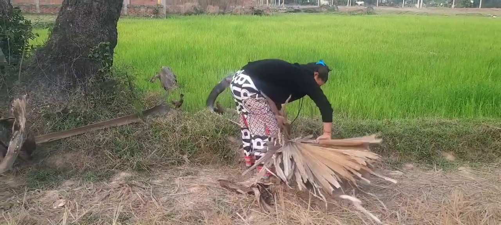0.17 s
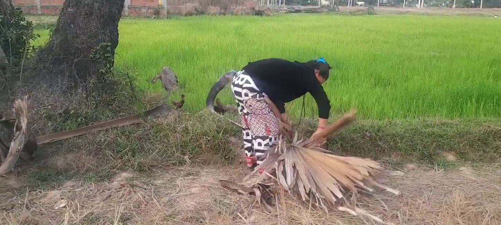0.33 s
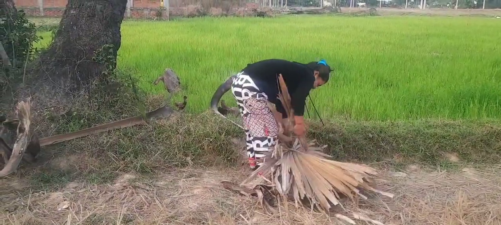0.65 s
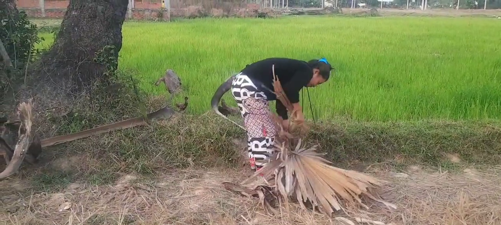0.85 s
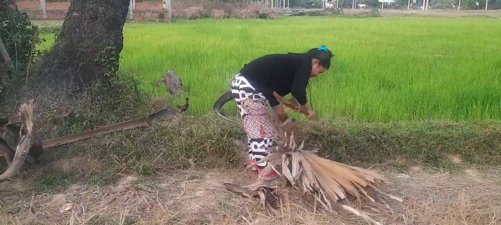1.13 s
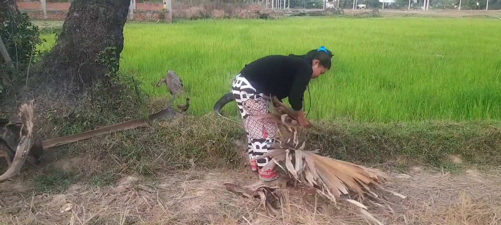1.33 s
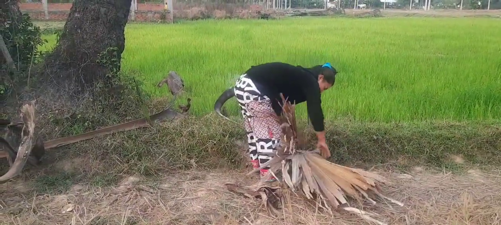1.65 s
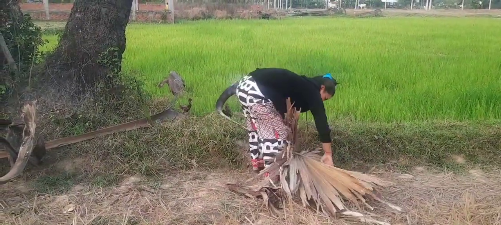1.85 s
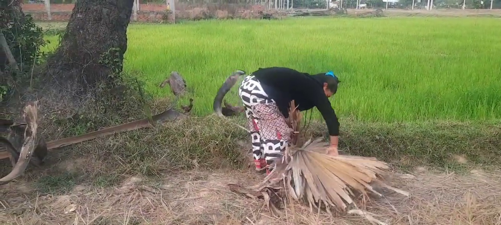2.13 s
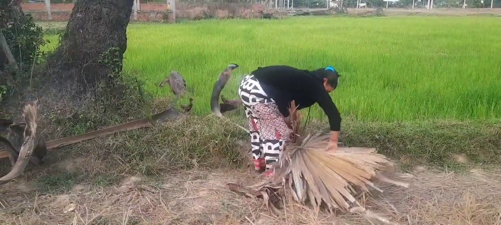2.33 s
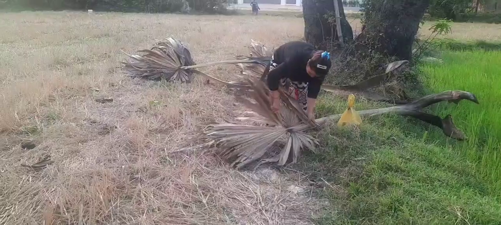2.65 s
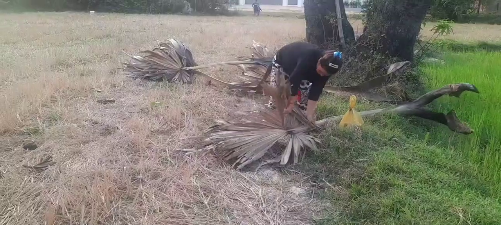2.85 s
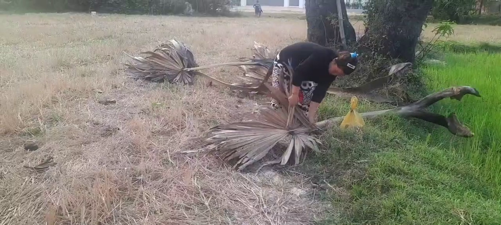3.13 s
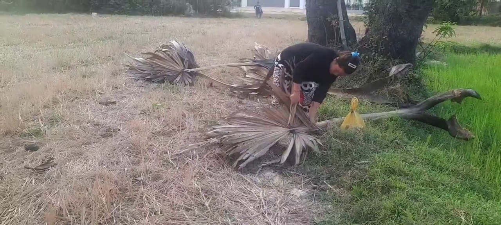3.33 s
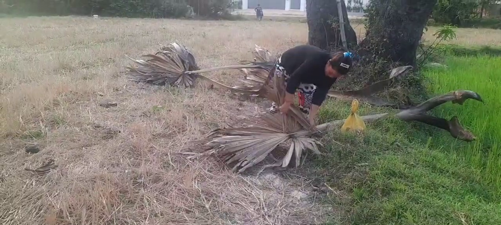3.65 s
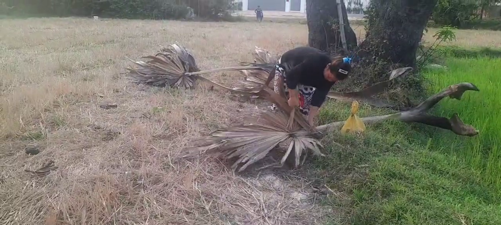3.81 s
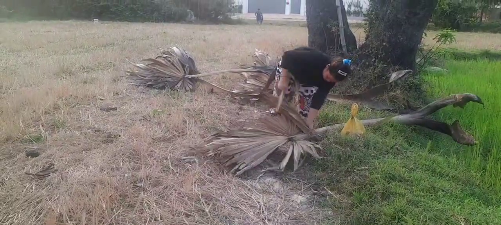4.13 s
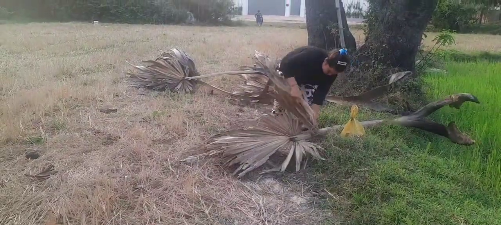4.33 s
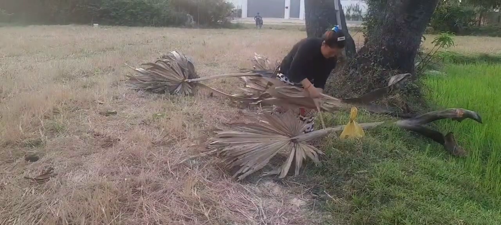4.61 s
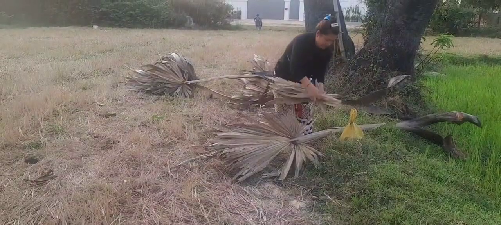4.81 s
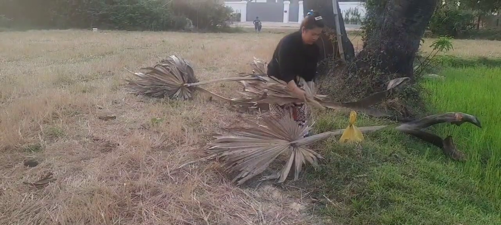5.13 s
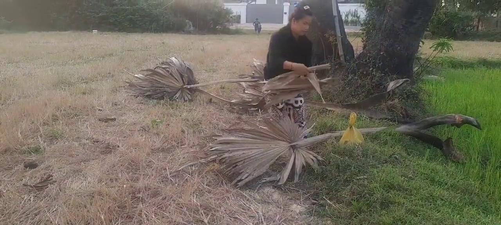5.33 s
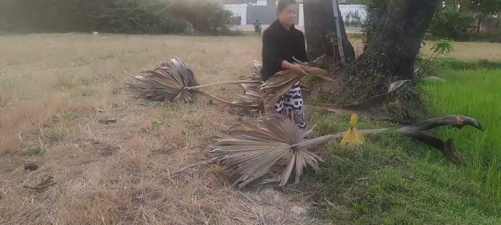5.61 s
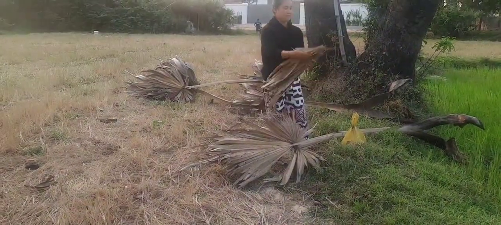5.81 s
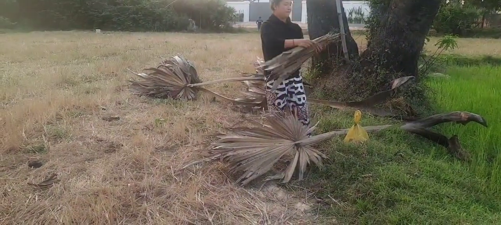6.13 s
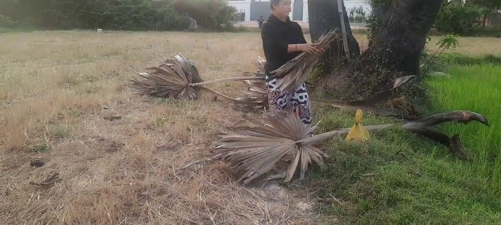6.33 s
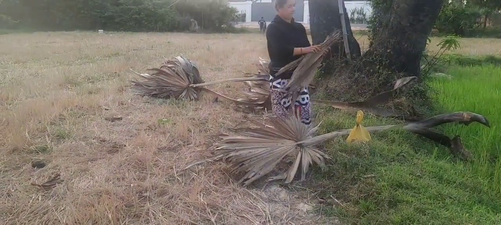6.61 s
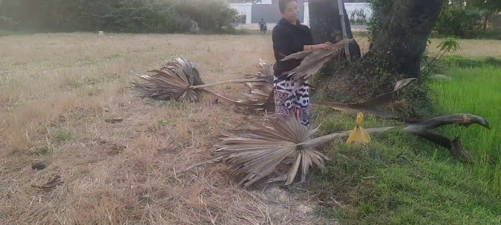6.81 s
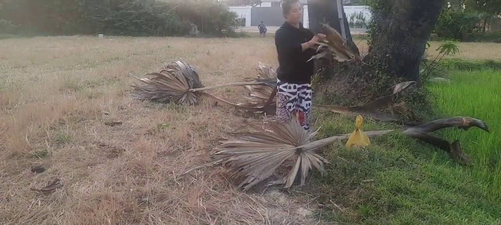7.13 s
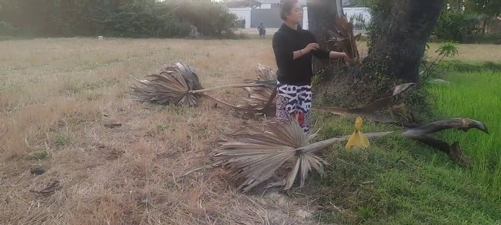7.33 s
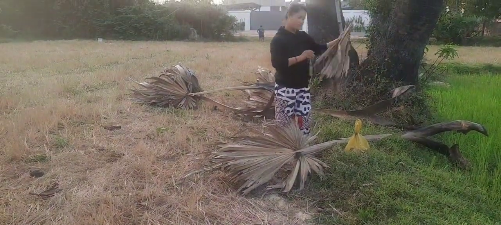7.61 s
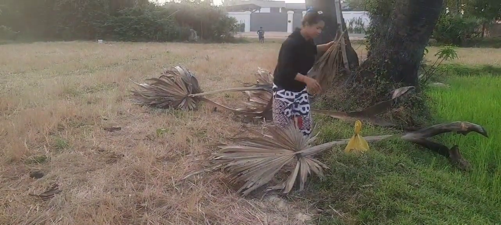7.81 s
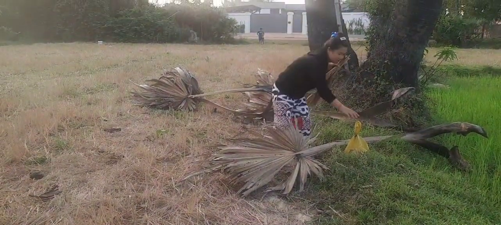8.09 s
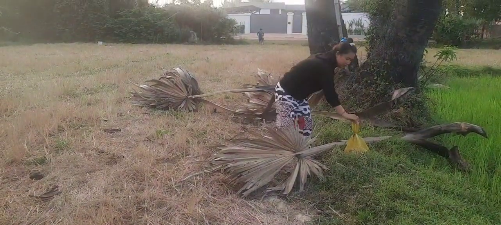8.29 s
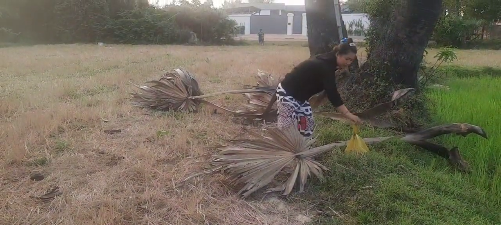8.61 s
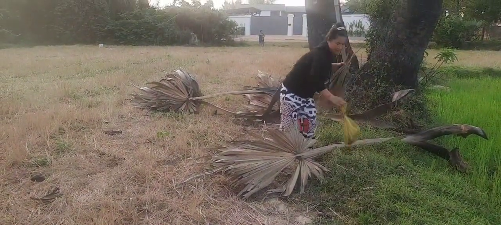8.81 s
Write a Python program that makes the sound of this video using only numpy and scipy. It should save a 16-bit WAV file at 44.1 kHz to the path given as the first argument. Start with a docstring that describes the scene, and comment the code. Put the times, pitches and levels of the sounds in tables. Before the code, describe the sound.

Dry fan-palm leaves rustle, snap and scrape as they are torn and bundled by hand outdoors, with light wind and faint birds.

```python
"""Dry fan-palm leaves rustle at once, then snap and scrape, torn and bundled by hand a few metres away.
Swarms of tiny clicks make the buckling blades; shaped bursts of them snap and tear, and the pile scatters all.
Two spots follow each other with a very short silence between; the second fan gives way to loose strips in the hands.
Low noise makes the breeze and the gusts at the right port, pale noise the open air, blurred tones the faint birds."""
import sys
import numpy as np
from scipy import signal
from scipy.fft import rfft, irfft, next_fast_len
from scipy.io import wavfile
from scipy.ndimage import uniform_filter1d

SR = 44100
rng = np.random.default_rng(int(sys.argv[2]) if len(sys.argv) > 2 else 0)


def log_audio(samples):
    """Write samples as a 16-bit WAV file to the path given in sys.argv[1]."""
    # one column per channel
    frames = np.atleast_2d(samples).T
    # limit to full scale, then quantise
    limited = np.clip(frames, -1, 1)
    pcm = np.round(limited * 32767).astype(np.int16)
    wavfile.write(sys.argv[1], SR, pcm)


N = 394694
TIME = np.arange(N) / SR  # seconds
FREQ = np.arange(N // 2 + 1) * SR / N + 1e-3  # Hz, kept above zero for the logarithm

CUT_S, RESUME_S = 2.391, 2.421  # silence between the two spots
IN_HANDS_S = 5.25  # from here on loose strips are handled
GRIP_S, LET_GO_S = .015, 0.025  # a stroke builds, a stroke dies away
REST_DB, REST_BODY_DB = -57, 0  # leaves that are only held: rustle level and hollowness
PILE_DB, PILE_S, TREES_S = -6, .004, .032  # smear in the pile; fade of the tail from the trees
CEILING, TOP_HZ = .85, 15700  # soft limit (full scale 1) and top of the spectrum

# The hands pull, gather or shift the leaves; body is the hollow share below 2 kHz:
# start_s [s], length_s [s], level_db [dB before colouring], body_db [dB]
STROKES = [(0.0, 0.16, -32, -2.5), (0.195, 0.064, -26.5, 2.5), (0.358, 0.078, -29, -4.5),
           (0.552, 0.05, -31, -2), (0.724, 0.089, -36, 8.5), (1.031, 0.068, -36.5, 2.5),
           (1.237, 0.12, -31, -3.5), (1.771, 0.1, -35.5, -4.5), (1.961, 0.12, -35, 0),
           (2.161, 0.023, -33, 10.5), (2.445, 0.14, -32.5, -10), (2.587, 0.19, -24, -7.5),
           (2.975, 0.17, -35, -9), (3.66, 0.31, -33, -1), (3.814, 0.025, -29, -4), (4.0, 0.12, -31.5, -5),
           (4.242, 0.4, -41, 3), (4.928, 0.025, -30, 0), (5.055, 0.1, -40.5, 3.5),
           (5.272, 0.25, -45.5, 4.5), (5.501, 0.11, -31.5, -1), (5.704, 0.092, -37, 3.5),
           (5.824, 0.051, -32.5, 0.5), (5.961, 0.018, -38.5, 3), (6.183, 0.14, -30.5, 0.5),
           (6.393, 0.25, -39, 3), (6.674, 0.073, -39.5, 3.5), (6.923, 0.21, -50, -4),
           (7.772, 0.023, -43, 4), (7.986, 0.011, -44, 5), (8.107, 0.039, -46, 14.5), (8.61, 0.38, -55, -1)]
# How the first fan, the second fan and the strips move, one row each:
# smooth_drag [0-1], settling_db [dB against the stroke], settling_s [s]
FEEL = [(0.07, -9.5, 0.43), (0.2, -7, 0.31), (0.45, -5.5, 0.1)]
# A blade snaps or is knocked; body is its hollow share:
# start_s [s], level_db [dB peak before the overall trim], body_db [dB]
SNAPS = [(0.106, -10, -23), (0.148, -14, -18), (0.184, -3.5, -8), (0.313, -6, -7), (0.344, -6, -18),
         (0.38, -14, -16), (0.421, -11.5, -28), (0.496, -14.5, -22), (0.536, -16, -19), (0.604, -10.5, -20),
         (0.654, -17, -23), (0.663, -7, -14), (0.672, -8, -18), (0.717, -8.5, -12.5), (0.748, -9, -9.5),
         (1.277, -6.5, -16.5), (1.435, -16.5, -32), (2.159, -10.5, -1), (2.302, -17, -15),
         (2.386, -21, -38), (2.439, -7.5, -21.5), (2.452, -8.5, -7.5), (2.505, -7, -21), (2.521, 0, -24),
         (2.57, -3.5, -22), (2.619, -5, -14), (2.69, -2, -27), (2.701, -0.5, -21), (2.783, -6.5, -10.5),
         (2.816, -10.5, -12), (2.835, -7, -17.5), (2.914, -12.5, -27), (2.933, -5.5, -31),
         (2.957, -5.5, -17), (2.998, -5, -19), (3.023, -7.5, -33), (3.055, -16, -29), (3.078, -17.5, -31),
         (3.104, -6.5, -27), (3.283, -17.5, -10), (3.438, -20, -36), (3.575, -12, -20.5),
         (3.988, -5.5, -23.5), (4.16, -14, -21), (4.889, -21.5, -3.5), (5.312, -20, -19), (5.512, -19, -18),
         (5.833, -19, -26), (6.03, -23, -12), (6.487, -16, -6), (6.619, -16, -28), (6.85, -20, -11),
         (7.032, -22, -11), (7.628, -21.5, -18), (7.806, -18.5, -14), (8.412, -36, -1.5)]
# A strip tears or slides over its neighbours:
# height_s [s], swell_s [s], fade_s [s], level_db [dB before ring and colouring], pitch_hz [Hz]
SCRAPES = [(0.229, 0.0015, 0.0086, -14, 1150), (2.525, 0.0099, 0.016, -18.5, 1600),
           (2.765, 0.033, 0.0087, -16, 1430), (3.117, 0.0061, 0.028, -21.5, 1150),
           (4.065, 0.017, 0.014, -15.5, 560), (6.156, 0.0071, 0.015, -23.5, 580),
           (6.181, 0.0075, 0.006, -18, 1160), (6.628, 0.019, 0.006, -26, 1620)]
# Colour of the brittle first fan: freq_hz [Hz], level_db [dB, relative]
FIRST_FAN = [(200, -22.5), (304, -6), (479, -10), (641, -14), (1030, -5), (1560, -12), (2090, -5),
             (2560, -14), (3890, -11), (7220, -15), (8980, -28), (12900, -20)]
# Colour of the second fan: freq_hz [Hz], level_db [dB, relative]
SECOND_FAN = [(120, -8), (200, -15.5), (333, -3.5), (497, -17), (880, -2.5), (1130, -9.5), (1650, -5.5),
              (2750, -9), (6020, -9.5), (9310, -24.5), (12000, -19), (15500, -29)]
# Colour of the loose strips in the hands: freq_hz [Hz], level_db [dB, relative]
STRIPS = [(200, -17), (340, -2.5), (500, -5.5), (850, -2), (1300, -6.5), (1750, -1), (2090, -8.5),
          (2440, -0.5), (3000, -5), (6300, -5), (9400, -20), (11800, -15), (15500, -25.5)]
# Left minus right at the two ports, before scaling by direction: freq_hz [Hz], difference_db [dB]
PORTS = [(600, 2), (2000, 4), (3300, -1), (6100, -5.5), (8700, -12), (10500, 10), (12300, 5.5), (15000, 0)]
# Colour of the light breeze: freq_hz [Hz], level_db [dB, relative]
RUMBLE = [(18, -23), (60, 2.5), (140, -3), (700, -45)]
# Colour of the open air: freq_hz [Hz], level_db [dB, relative]
OPEN_AIR = [(230, -21), (315, -2.5), (400, -12), (1100, -22), (4700, -27.5), (9300, -36.5), (10600, -22.5),
            (12500, -55)]
# Wind hits the right port: peak_s [s], level_db [dB before the overall trim]
GUSTS = [(2.45, -21.5), (2.919, -22), (3.647, -24), (3.743, -20), (5.03, -23), (5.247, -26.5), (5.404, -20),
         (5.683, -17), (5.765, -22), (5.88, -21), (6.024, -26), (6.327, -22.5)]
# Colour of the gusts: freq_hz [Hz], level_db [dB, relative]
BUFFET = [(25, -34), (60, 4.5), (110, 0), (190, -13.5), (700, -60)]
# Faint far bird notes: middle_s [s], pitch_hz [Hz], level_db [dB before blurring]
CHIRPS = [(5.335, 2820, -48), (5.94, 2730, -51), (7.39, 5500, -58), (8.11, 5570, -57)]


def undb(db):
    """Decibels to gain."""
    return 10 ** (np.asarray(db) / 20)


def unit(x):
    """Scale to rms 1."""
    return x / np.sqrt(np.mean(x ** 2) + 1e-18)


def sides(db):
    """Left and right gains for a level difference, left minus right."""
    return undb(np.array([[.5], [-.5]]) * db)


def bell(x, width):
    """A smooth hump around zero."""
    return np.exp(-(x / width) ** 2)


def shape(x, gain_at):
    """Filter by a gain that depends on frequency."""
    size = next_fast_len(x.shape[-1], real=True)
    hz = np.maximum(np.arange(size // 2 + 1) * SR / size, 1)
    return irfft(rfft(x, size) * gain_at(hz), size)[..., :x.shape[-1]]


def lows(x, corner_hz):
    """Steep low-pass."""
    return shape(x, lambda hz: 1 / (1 + (hz / corner_hz) ** 4))


def highs(x, corner_hz):
    """Gentle high-pass."""
    return shape(x, lambda hz: 1 / np.sqrt(1 + (corner_hz / hz) ** 4))


def db_at(points, hz):
    """Read (Hz, dB) points on a log-frequency axis."""
    f, db = np.transpose(points)
    return np.interp(np.log(hz), np.log(f), db)


def colour(x, points):
    """Give a white sound a spectrum and keep its power."""
    mean_power = np.mean(undb(db_at(points, FREQ)) ** 2)
    return shape(x, lambda hz: undb(db_at(points, hz))) / np.sqrt(mean_power)


def walk(rate_hz):
    """Smooth random wander with rms near 1, redrawn at the given rate."""
    size = int(SR / rate_hz)
    held = np.repeat(rng.standard_normal(N // size + 1), size)
    return unit(uniform_filter1d(held, size))[:N]


def jerks(per_s, fade_s):
    """Jerks at random moments; each starts at once and dies away."""
    starts = (rng.random(N) < per_s / SR) * (.5 + rng.random(N))
    return signal.lfilter([1], [1, -np.exp(-1 / (fade_s * SR))], starts)


def steady(x, span_s):
    """Hold the mean power of a sound constant over a short span, leaving its fine grain."""
    power = uniform_filter1d(np.mean(x ** 2, axis=0), max(int(span_s * SR), 2))
    return x / np.sqrt(power + 1e-6)


def air(apart_hz):
    """Noise that is alike at both ports in the bass and less alike in the treble."""
    mid, side = rng.standard_normal((2, N))
    side = highs(side, apart_hz)
    return unit(np.array([mid + side, mid - side]))


def hollow(x, body_db, corner_hz=2000):
    """Tip the balance: a whole blade bending sounds hollow, a splitting edge sounds sharp."""
    body = lows(x, corner_hz)
    return body * undb(body_db / 2) + (x - body) * undb(-body_db / 2)


def buckles(per_s, spread_db, tint_db, lag_s=7e-5, fan_s=3.6e-5):
    """A swarm of clicks, each with its own size, tint and place; the left port mostly hears them a little later."""
    count, size = 40000, next_fast_len(N, real=True)
    at = rng.integers(0, N, count)
    force = undb(spread_db * np.minimum(rng.exponential(size=count), np.pi))
    force = force * (np.arange(count) < per_s * N / SR)  # only as many clicks as the rate asks for
    lag = np.rint(SR * (lag_s + fan_s * rng.standard_normal(count))).astype(int)
    centres = np.log(np.geomspace(400, 14000, 10))
    pitch = np.log(np.arange(size // 2 + 1) * SR / size + 1)
    swarm = 0
    for band in np.eye(len(centres)):
        tint = undb(tint_db * (2 * rng.random(count) - 1))
        push = force * tint * rng.choice([-1, 1], count)
        left, right = np.bincount((at + lag) % N, push, size), np.bincount(at, push, size)
        swarm = swarm + rfft(np.array([left, right])) * np.sqrt(np.interp(pitch, centres, band))
    return unit(irfft(swarm, size)[:, :N])


def stage(s):
    """Which leaves are being worked: 0 the first fan, 1 the second fan, 2 the held strips."""
    return np.searchsorted([RESUME_S, IN_HANDS_S], s)


def handling():
    """Rustle level and hollowness in dB: strokes build, hold, let go and settle; hollowness is weighted by power."""
    power = np.full(N, undb(REST_DB) ** 2)
    body = power * REST_BODY_DB
    for start, length, db, body_db in STROKES:
        early, late = np.maximum(start - TIME, 0), np.maximum(TIME - start - length, 0)
        _, settle_db, settle_s = FEEL[stage(start)]
        release = np.maximum(np.exp(-late / LET_GO_S), undb(settle_db) * np.exp(-late / settle_s))
        stroke = (undb(db) * np.exp(-early / GRIP_S) * release) ** 2
        power = power + stroke
        body = body + stroke * body_db
    return 10 * np.log10(power), body / power


def rustle(effort_db, crackle_db=-5, slips_per_s=70, slip_s=0.011, tips_db=-7, tips_swing_db=5,
           tips_hz=4000, ticks_per_s=55, ticks_db=-6, tick_s=0.00067):
    """Blades drag with a fine hiss and buckle in crackles; they catch and slip in sudden spurts, and their tips tick."""
    crackle = steady(buckles(per_s=300, spread_db=1, tint_db=3.5), span_s=0.049)
    hiss = buckles(per_s=4000, spread_db=2.0, tint_db=2.0)  # dense enough to merge into a hiss
    drag = np.clip(np.array(FEEL)[stage(TIME), 0], 0, 1)
    grip = drag + jerks(slips_per_s, slip_s)
    edge = highs(hiss, tips_hz)
    tips = unit(edge * undb(tips_swing_db * walk(250)))
    spurts = steady(grip * (hiss + undb(tips_db) * tips), span_s=0.076)
    ticks = unit(edge * jerks(ticks_per_s, tick_s)) * (1 - drag)  # lone tips flick past each other
    return (spurts + undb(crackle_db) * crackle + undb(ticks_db) * ticks) * undb(effort_db)


def snaps(fibres, level_db=-13.0, tick_db=-1, tick_s=0.00088, crack_s=0.006, flap_db=-11, flap_s=0.0069,
          lead_db=-22, lead_s=0.0019, usual_body_db=-14, slow_db=0.5):
    """A blade gives way with a tick and a run of cracks after a very short soft rise, and flaps on; hollow ones slower."""
    fibres = steady(fibres + .5 * air(2300), span_s=0.0028)
    out, before = np.zeros((2, N)), SR // 50
    for s, db, body_db in SNAPS:
        span = slice(int(s * SR) - before, int(s * SR) + SR // 8)
        hollowness_db = body_db - usual_body_db
        age = (TIME[span] - s) / undb(slow_db * hollowness_db)  # stretches all the times above
        tick = undb(tick_db) * np.exp(-abs(age) / tick_s)
        flap = undb(flap_db) * np.exp(-abs(age) / flap_s)
        lead = undb(lead_db) * np.exp(-abs(age) / lead_s)
        force = np.where(age < 0, lead, tick + bell(age, crack_s) + flap)
        out[:, span] += undb(db + level_db) * hollow(fibres[:, span] * force, hollowness_db)
    return out


def scrapes(fibres, ring_db=6.0, ring_octaves=0.23):
    """Fibres part in a dense run of clicks that swells and dies away; each strip rings at its own pitch."""
    fibres, out = steady(fibres, span_s=0.003), 0
    for s, swell, fade, db, ring_hz in SCRAPES:
        force = undb(db) * np.exp(np.minimum((TIME - s) / swell, (s - TIME) / fade))
        out = out + shape(fibres * force, lambda hz: undb(ring_db * bell(np.log2(hz / ring_hz), ring_octaves)))
    return out


def scatter(x, pile_db, pile_s, trees_db, trees_s, dull_db):
    """Each click takes its own paths through the pile, a short smear; the trees return a longer, duller tail."""
    def split(y):
        """Body and edge of a sound."""
        body = lows(y, 3000)
        return body, y - body

    out = x
    for band, paths, loss_db in zip(split(x), split(air(1900)), (0, dull_db)):
        power = np.mean(band ** 2, axis=0)
        echo = 0
        for db, fade in ((pile_db, pile_s), (trees_db + loss_db, trees_s)):
            keep = np.exp(-2 / (fade * SR))
            echo = echo + undb(db) ** 2 * signal.lfilter([1 - keep], [1, -keep], power)
        out = out + np.sqrt(echo) * unit(paths)  # noise that follows the echoed power
    return out / np.sqrt(1 + undb(pile_db) ** 2)


def turning(x, ring_db=2.5, drift_db=1.5):
    """Ever different blades ring: brief narrow resonances, and broader ones that shift more slowly."""
    size, overlap = 512, 384
    cells = signal.stft(x, nperseg=size, noverlap=overlap)[2]

    def patches(bins, frames):
        """Smooth chance over frequency bins and time frames."""
        p = rng.standard_normal(cells.shape[1:])
        for _ in range(2):
            p = uniform_filter1d(uniform_filter1d(p, bins, axis=0), frames, axis=1)
        return np.clip(unit(p), -2, 2)

    brief, broad = patches(bins=3, frames=5), patches(bins=6, frames=36)
    gain = unit(undb(ring_db * brief + drift_db * broad))
    return signal.istft(cells * gain, nperseg=size, noverlap=overlap)[1][:, :N]


def leaves(usual_body_db=-4):
    """All leaf sounds, coloured by the leaves being worked and by the direction they lie in."""
    effort_db, body_db = handling()
    tearing = scrapes(buckles(per_s=4000, spread_db=2.5, tint_db=5.5))
    rubbing = hollow(rustle(effort_db) + tearing, body_db - usual_body_db)
    cracking = snaps(buckles(per_s=4400, spread_db=3.5, tint_db=0.0))
    scattered = scatter(rubbing + cracking, pile_db=PILE_DB, pile_s=PILE_S,
                        trees_db=-5, trees_s=TREES_S, dull_db=-3)
    clicks = turning(scattered)
    first, held = TIME < RESUME_S, TIME > IN_HANDS_S
    out = 0
    # off_axis scales the difference between the ports
    for when, spectrum, off_axis in ((first, FIRST_FAN, .35), (~first & ~held, SECOND_FAN, 1.05),
                                     (held, STRIPS, .8)):
        tinted = colour(clicks * when, spectrum)
        out = out + shape(tinted, lambda hz: sides(off_axis * db_at(PORTS, hz)))
    return out


def breeze(first_db=-50, second_db=-44, first_pan_db=-10, waver_db=2):
    """A light breeze rumbles as wavering low noise, leaning right in the first spot and centred in the second."""
    rumble = colour(air(224), RUMBLE) * undb(waver_db * walk(6.5))
    return rumble * np.where(TIME < RESUME_S, undb(first_db) * sides(first_pan_db), undb(second_db))


def open_air(air_db=-54):
    """Soft open-air hiss: coloured noise that wanders slowly in level."""
    return colour(air(440), OPEN_AIR) * undb(air_db + walk(1.36))


def gusts(gust_db=-8, gust_pan_db=-10, gust_s=0.039, wake_db=-17, wake_s=0.3, eddy_db=-8, eddy_s=0.0082,
          eddy_hz=230, strong_db=-18):
    """Gusts tumble over the right port amid stirred air; a short sharp eddy grows faster than the gust itself."""
    power, burst = 0, 0
    for s, db in GUSTS:
        push = bell(TIME - s, gust_s) + undb(wake_db) * bell(TIME - s, wake_s)
        power = power + (undb(db + gust_db) * push) ** 2
        burst = burst + undb(2 * db - strong_db + eddy_db) * bell(TIME - s, eddy_s)
    tumble = steady(colour(rng.standard_normal((2, N)), BUFFET), span_s=0.034)
    eddies = steady(unit(lows(rng.standard_normal((2, N)), eddy_hz)), span_s=0.021)
    return (np.sqrt(power) * tumble + burst * eddies) * sides(gust_pan_db)


def birds(chirp_width_hz=120, chirp_s=0.034, sag_hz_per_s=1500):
    """A few far bird notes: humps of sine that sag in pitch, blurred by the distance with slow noise."""
    blur = unit(shape(rng.standard_normal(N), lambda hz: bell(hz, chirp_width_hz)))
    chirps = 0
    for s, hz, db in CHIRPS:
        age = TIME - s
        tone = np.sin(2 * np.pi * (hz - sag_hz_per_s * age / 2) * age)
        chirps = chirps + undb(db) * bell(age, chirp_s) * tone
    return np.sqrt(2) * blur * chirps


def scene():
    """Leaves, wind, open air and birds."""
    return leaves() + breeze() + open_air() + gusts() + birds()


def record(dry, low_hz=40):
    """The sound drops out briefly between the two spots; loud peaks are rounded, deep bass and top are cut."""
    live = uniform_filter1d(1. * ((TIME < CUT_S) | (TIME > RESUME_S)), size=64)
    no_bass = signal.sosfilt(signal.butter(4, low_hz, "high", fs=SR, output="sos"), dry)
    rounded = CEILING * np.tanh(live * no_bass / CEILING)
    return signal.sosfilt(signal.ellip(10, .2, 80, TOP_HZ, fs=SR, output="sos"), rounded)


dry = scene()
out = record(dry)
log_audio(out)
```